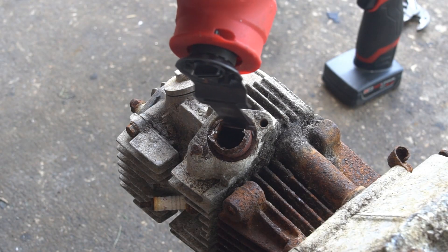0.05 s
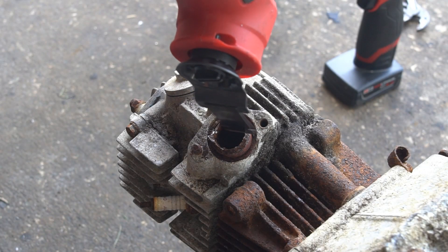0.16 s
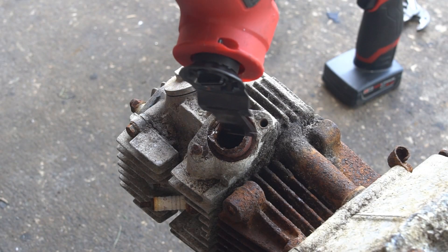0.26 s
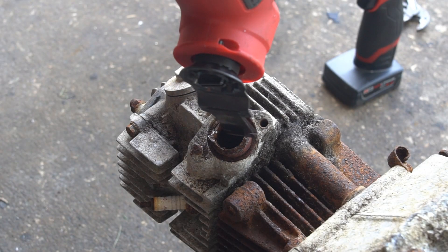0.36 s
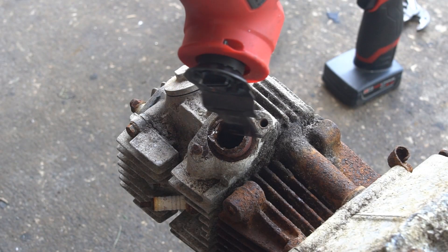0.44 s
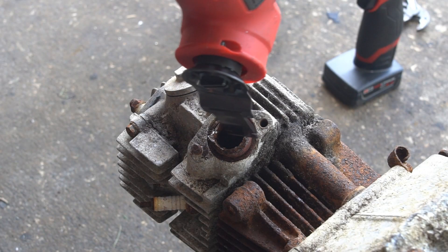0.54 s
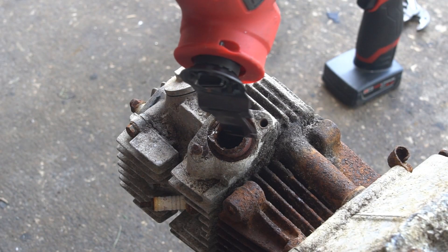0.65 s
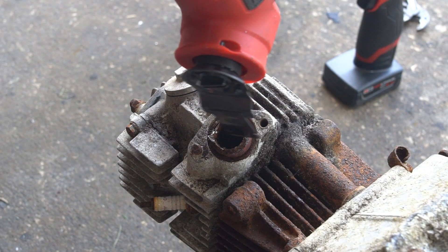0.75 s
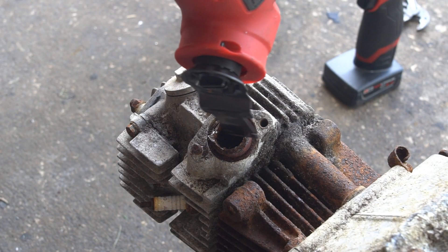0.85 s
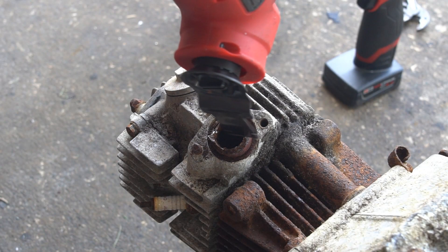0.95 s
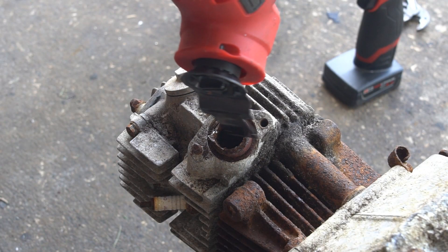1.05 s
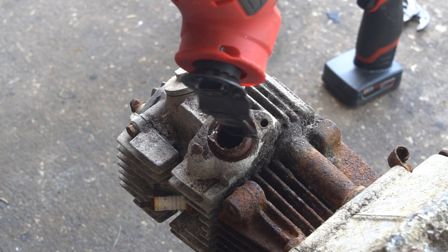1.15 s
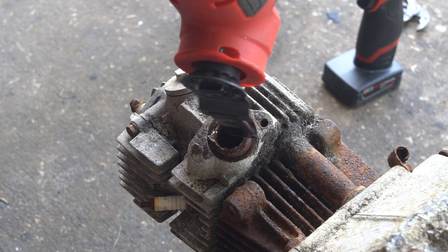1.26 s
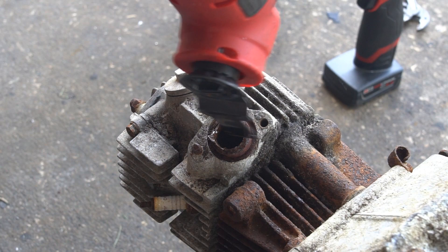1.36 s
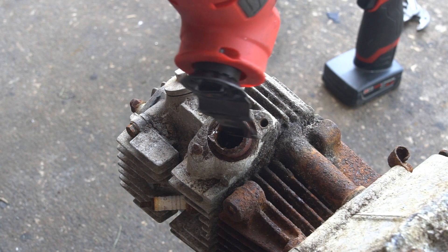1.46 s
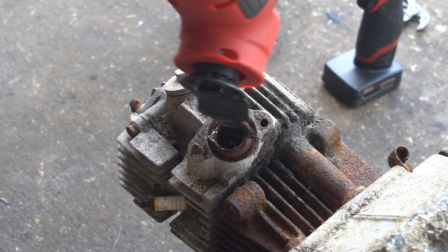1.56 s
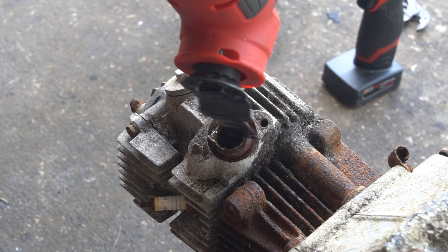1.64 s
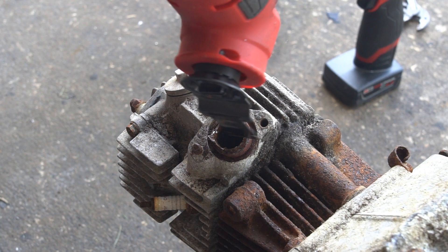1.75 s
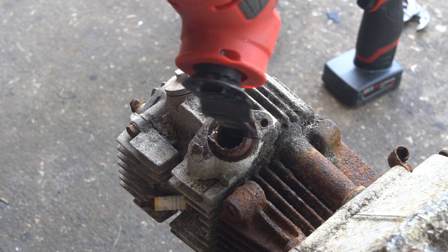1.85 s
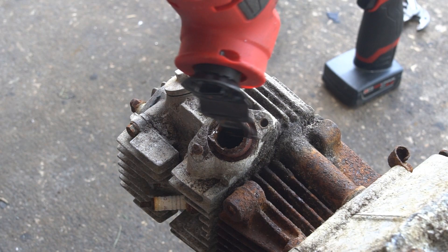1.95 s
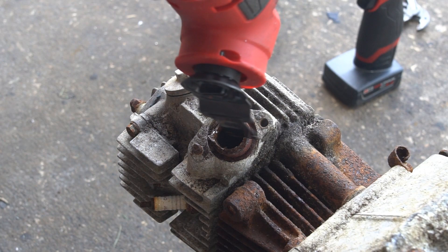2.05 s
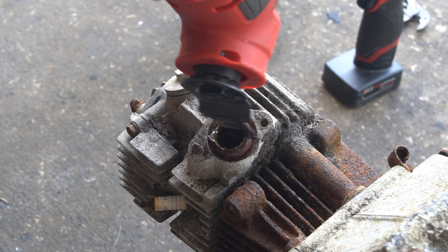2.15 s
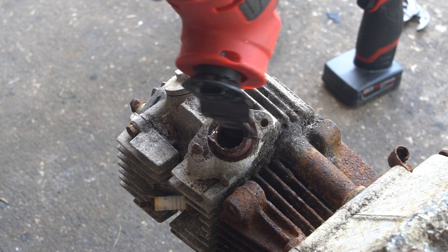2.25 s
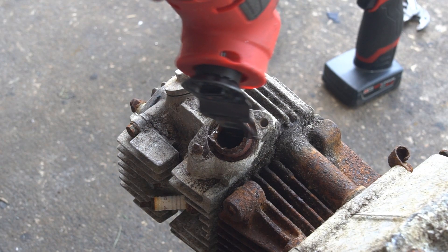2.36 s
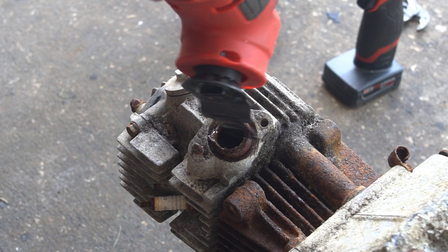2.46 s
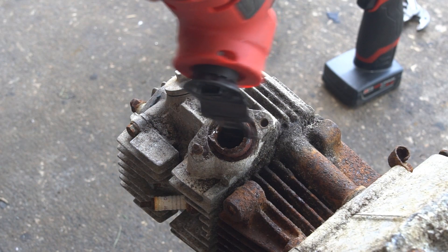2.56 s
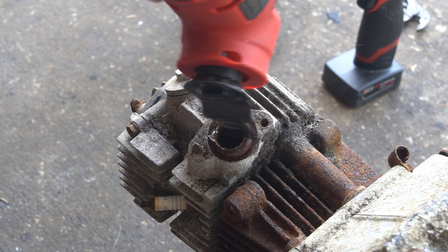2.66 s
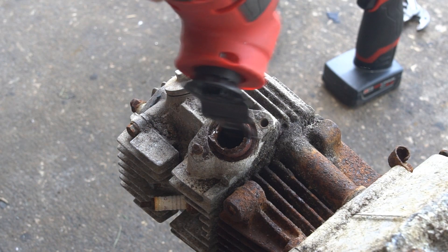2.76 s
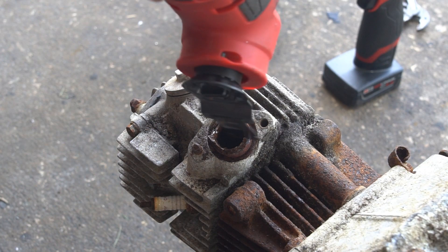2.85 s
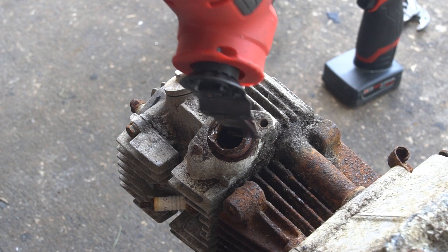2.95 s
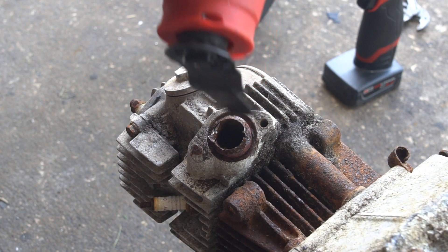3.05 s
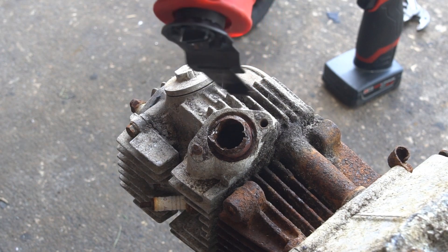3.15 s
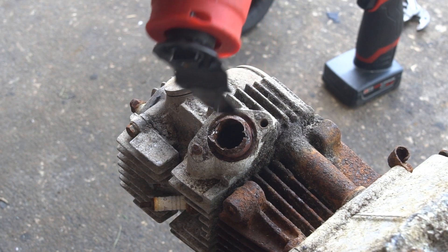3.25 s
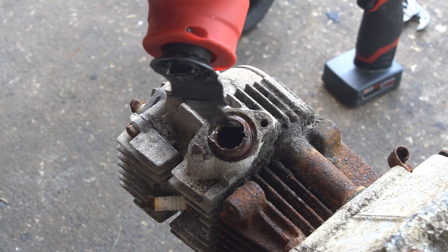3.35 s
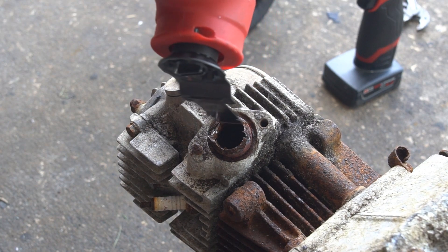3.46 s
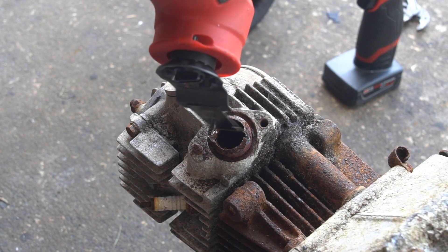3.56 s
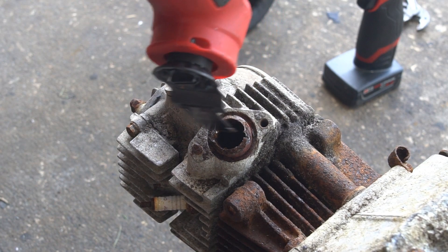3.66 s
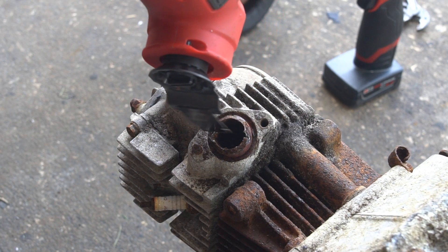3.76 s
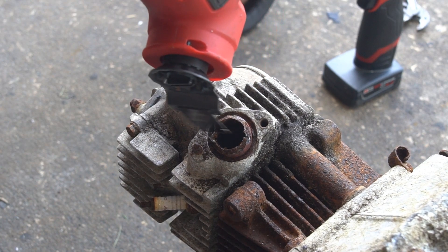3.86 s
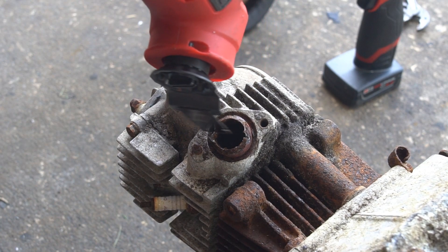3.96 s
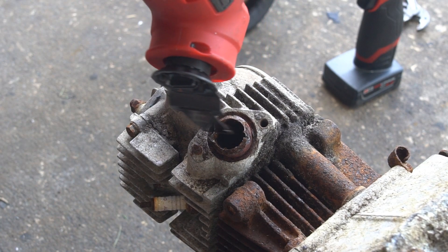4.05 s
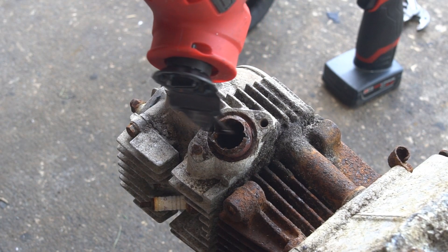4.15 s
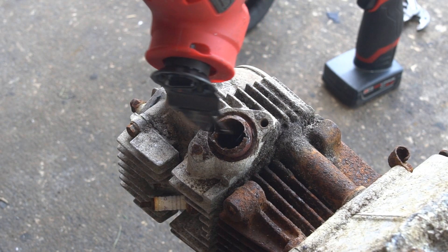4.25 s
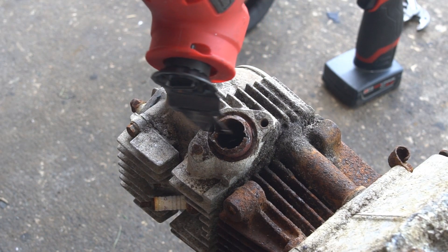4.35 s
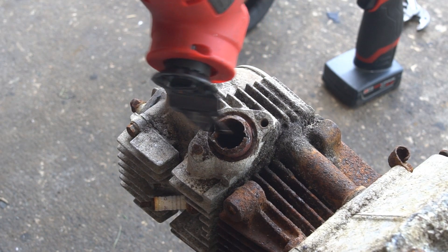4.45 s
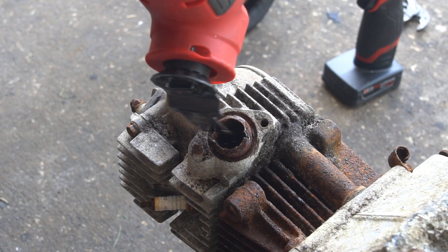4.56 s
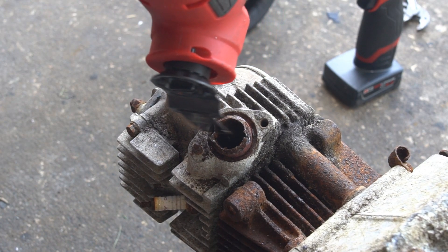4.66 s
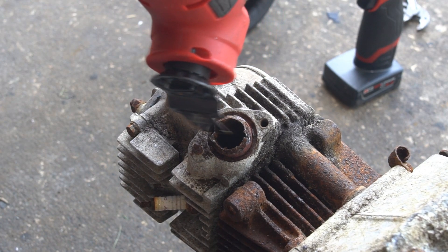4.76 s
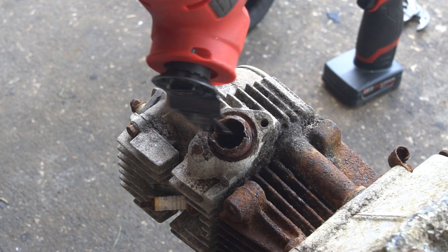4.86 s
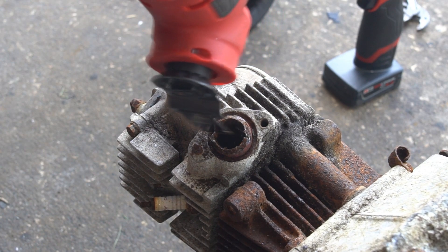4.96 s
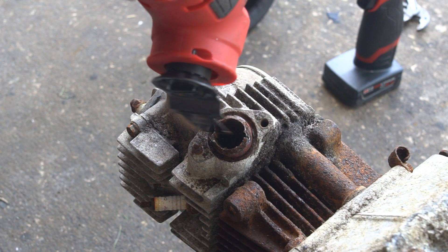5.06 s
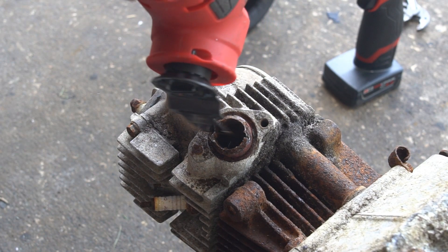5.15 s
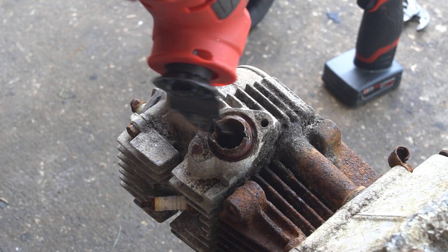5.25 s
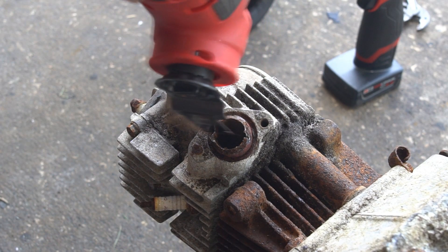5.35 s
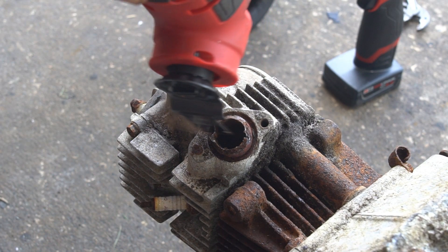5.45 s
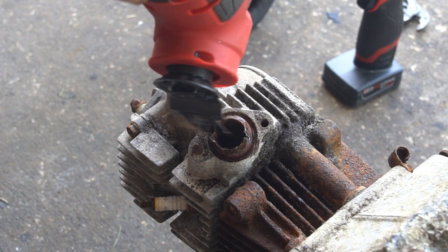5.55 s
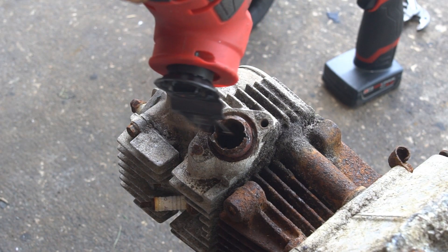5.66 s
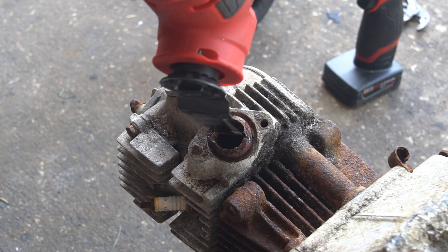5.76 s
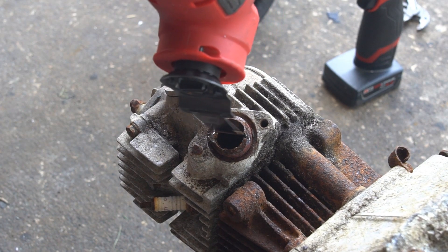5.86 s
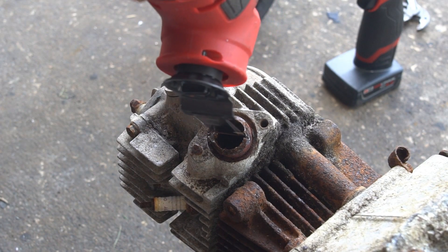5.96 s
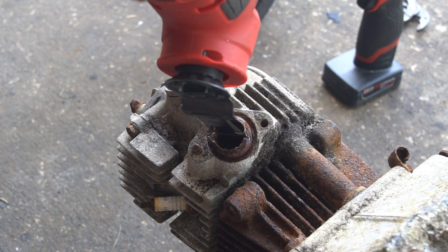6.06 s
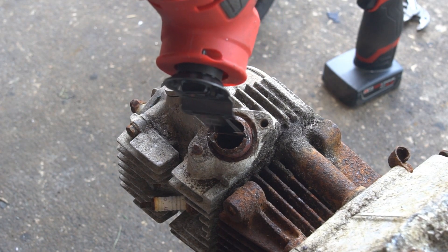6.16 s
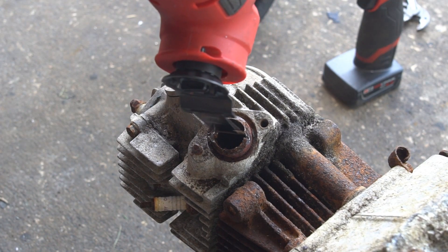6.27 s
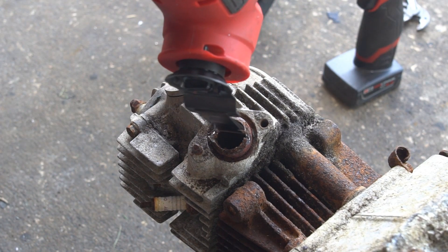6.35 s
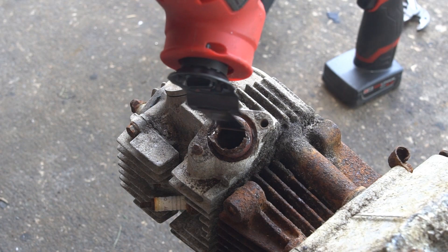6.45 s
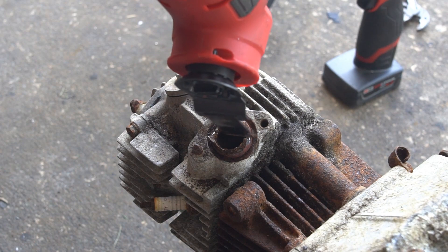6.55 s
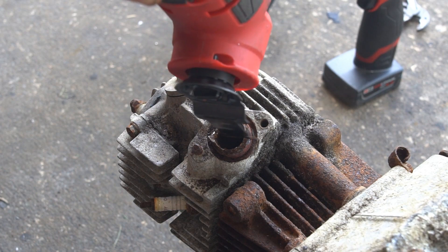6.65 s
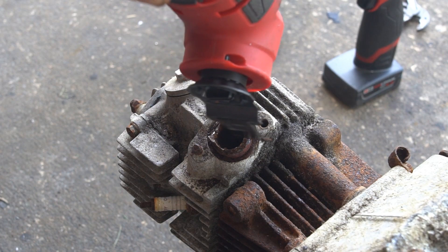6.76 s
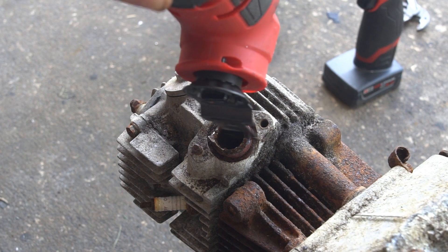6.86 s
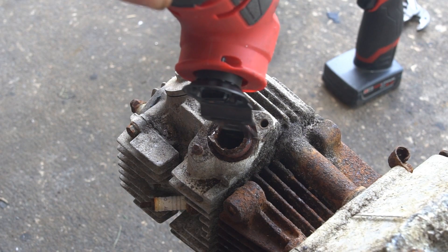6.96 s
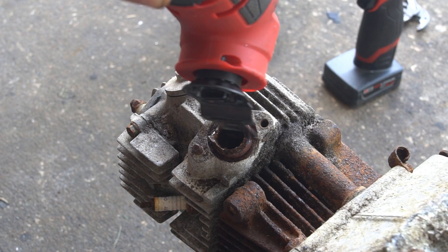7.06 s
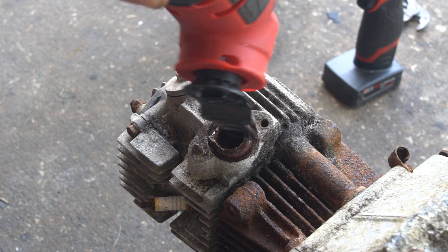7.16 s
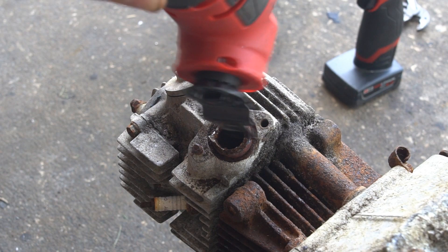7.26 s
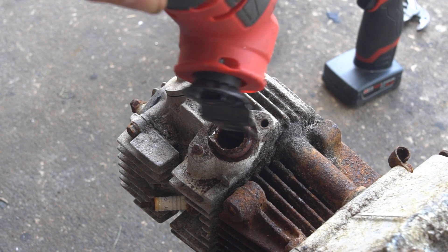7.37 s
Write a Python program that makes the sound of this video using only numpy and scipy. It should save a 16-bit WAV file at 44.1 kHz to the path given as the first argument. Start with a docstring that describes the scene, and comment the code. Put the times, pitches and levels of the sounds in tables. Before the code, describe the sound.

Close by, a power saw blade grinds harshly into rusted metal, lifts off with a steady motor buzz, then bites again.

```python
"""Oscillating saw on a rusty pipe stub

A cordless saw cuts a stub on a finned cylinder head, close by, in a humming workshop.
The motor holds one speed: drive lines plus gear noise. The teeth skip, bite and rasp on each
half stroke, the thin blade rings, and the head shudders and knocks under pressure.
Between cuts the tool runs free; once the blade mostly bounces on the rim."""
import sys
import numpy as np
from scipy import signal
from scipy.fft import rfft, irfft, next_fast_len
from scipy.io import wavfile
from scipy.ndimage import map_coordinates

SR = 44100
rng = np.random.default_rng(int(sys.argv[2]) if len(sys.argv) > 2 else 0)


def wav_out(sig):
    """Save sig, one row per channel (or a flat mono array), as 16-bit PCM at SR to the path in sys.argv[1]."""
    wavfile.write(sys.argv[1], SR, np.round(np.clip(np.atleast_2d(sig).T, -1, 1) * 32767).astype(np.int16))


N = 326781
MOTOR_HZ = 186.4

# blade on work: (start [s], length [s], rise [s], fall [s], level [dB], grip re level [dB], ring [dB])
CONTACTS = [(0.16, .12, .1, .02, -46, 8.5, -43), (0.284, .039, 0.011, 0.024, -33, 9.5, -26.5),
            (0.34, 0.14, .007, 0.047, -28.5, 6, -26.5), (0.51, 0.013, 0.0036, 0.059, -26.5, 3.5, -23.5),
            (0.529, 0.033, 0.016, 0.096, -23, 1.5, -25.5), (0.628, 0.069, 0.0037, 0.057, -25.5, 1.5, -25),
            (0.706, 2.16, 0.018, 0.15, -22, -1.5, -24.5), (3.675, 0.03, 0.011, 0.029, -33.5, 7.5, -43),
            (3.708, 0.024, .022, 0.058, -25, -1.5, -27), (3.764, .029, 0.021, 0.08, -18.5, -3.5, -26),
            (3.827, 0.057, .035, 0.051, -22, -3, -25), (3.899, 1.834, .016, 0.05, -21, -3.5, -26.5),
            (5.76, 0.07, .025, 0.037, -33.5, -2, -32.5), (5.955, 0.044, 0.0068, .04, -35.5, 4, -34.5),
            (5.973, .3, .03, 0.065, -25, -8.5, -27.5), (6.267, 0.063, 0.017, 0.12, -35, 3.5, -33),
            (6.548, .022, 0.0037, .04, -38, 8.5, -31.5), (6.621, .085, 0.0034, .03, -33, 0.5, -28.5),
            (6.712, 0.014, 0.0061, .04, -22, -2, -28), (6.73, 0.094, 0.017, .03, -26, -7.5, -28),
            (6.803, 0.037, 0.031, 0.045, -21.5, 0.5, -19.5), (6.844, 0.58, 0.022, .05, -23, -2.5, -23)]
# hand pressure: (time [s], level [dB])
PRESSURE_DB = [(0.3, -7.5), (0.8, 0), (1.4, -2), (2.2, 2), (2.55, 0), (2.68, -1), (2.88, 2), (3.7, -7.5),
               (4.3, -4.5), (4.6, 1), (5.0, 1.5), (5.15, 2.5), (5.58, 1.5), (5.78, -8), (6.88, -2),
               (7.1, 0.5), (7.41, 5)]
# blade bouncing: (time [s], share [0-1])
BOUNCE_SHARE = [(0, 0), (3.95, 0.09), (4.1, 0.35), (4.3, 0.24), (4.45, 0.23), (5.6, 0.12), (5.8, 0.1),
                (6.0, 0.44), (6.1, 0.83), (6.27, 0.8), (6.45, 0.5), (6.55, 0.01)]
# contact point on the edge: (time [s], position [0 middle, 1 corner])
CORNER_SHARE = [(0, 0.064), (3.0, 0.096), (3.6, 0.91), (4.3, 0.56), (5.5, 0.28), (6.0, 1), (6.4, 0.83),
                (6.6, .1), (7.41, 0.15)]
# snags that bend the blade: (time [s], level [dB], half width [s])
SNAG_SWELLS = [(0.468, -19.5, 0.013), (0.52, -26, .007), (0.58, -24, .008), (0.68, -25, 0.034),
               (0.802, -23.5, 0.0093), (3.702, -32, 0.0097), (6.3, -31.5, 0.037), (6.563, -31, 0.012)]
# head rocking on its support: (time [s], level [dB], knocks [count])
KNOCK_RUNS = [(2.375, -25, 1), (2.456, -26, 1), (2.536, -22, 3), (2.616, -22, 1), (2.804, -25, 2),
              (4.757, -29, 1), (4.794, -28, 1), (4.967, -23, 3), (5.357, -23, 2), (7.193, -28, 1),
              (7.337, -30, 1), (7.387, -26, 1)]

# blade, head and support resonances: (frequency [Hz], width [Hz], level [dB])
MIDDLE_MODES = [(3380, 110, -11), (6795, 80, -3), (6900, 70, -5), (7020, 80, -2), (7160, 80, 1),
                (7270, 80, -1), (7380, 80, -7), (7520, 80, -7), (8800, 500, -11), (10325, 60, -3),
                (10790, 60, -1), (10920, 60, -8), (11740, 70, -9), (12380, 160, -8), (14530, 60, 0)]
CORNER_MODES = [(3380, 80, -9), (7110, 100, 4), (7230, 120, -2), (7480, 120, -9), (9270, 160, -4),
                (9420, 130, 0), (10800, 60, 5), (11600, 60, -6), (11790, 60, -5), (12360, 200, -2),
                (13600, 220, -9), (14515, 80, 1), (14950, 300, -11), (15480, 150, -8)]
BENDING_MODES = [(2980, 90, -5), (3375, 70, 0), (3460, 70, -6), (3750, 70, -10), (7160, 60, 4)]
HEAD_MODES = [(1250, 50, -6), (1380, 70, -7), (1620, 90, -3), (1725, 70, 1), (1835, 70, 1), (2040, 50, -5),
              (2130, 50, 4), (2610, 60, -5), (2830, 70, -2), (2915, 90, 3), (3010, 80, 0), (3160, 80, -4),
              (3380, 90, -4), (3735, 90, 2), (4290, 130, -2), (4450, 130, -6), (4850, 110, -4),
              (5750, 170, -7)]
SUPPORT_MODES = [(278.5, 6.2, 0), (357, 28, -3), (457, 23, 8), (620, 155, 8.5), (724, 34, 5.5),
                 (885, 60, -28.5)]

# free-running drive: (harmonic [x stroke rate], level [dB])
DRIVE_LINES = [(1, -26), (2, -31), (3, -9.5), (4, -14), (5, -24), (6, -4), (7, -8.5), (8, -8), (9, -8),
               (10, -6), (11, -16), (12, -11), (13, -12), (14, -8), (15, -2), (16, -10), (17, -12),
               (18, -4), (19, -16), (20, -6.5), (21, -9), (22, -16), (23, 0), (24, -13), (25, -10),
               (26, -3), (27, -11), (28, -12), (29, -9), (30, -15), (31, -15), (32, -13), (33, -12),
               (34, -15), (35, -12), (36, -11), (37, -13), (38, -9), (39, -11)]
# whines swelling as the tool moves: (time [s], harmonic 18 gain [dB], harmonic 23 gain [dB])
WHINE_DB = [(0, 3, 3), (0.22, 8, 1), (3.22, 0, -8), (3.34, -6, 3), (3.58, 5, 1), (4.2, -13, -2),
            (5.75, -4, -10), (5.86, 9, -1), (6.1, 3, -3), (7.41, 3, 2)]
# workshop hum: (frequency [Hz], level [dB])
HUM_LINES = [(118.4, -79), (150.7, -71.5), (209.9, -76.5), (242.2, -69), (269.2, -71)]

# spectra of scrape, rust dust, gears, rattle and room: (frequency [Hz], level [dB])
RASP_SPECTRUM = [(200, -30.5), (600, -18.5), (950, -13), (1300, -3), (1800, 1.5), (2400, 1), (3000, 2.5),
                 (4000, 3), (5000, 4.5), (6400, -2), (8000, -15.5), (12000, -16), (16000, -33)]
DUST_SPECTRUM = [(4000, -34), (7000, -14), (8000, -4), (8800, 0), (9500, -2), (9950, -6), (10700, -3),
                 (11300, -5), (12380, -1), (12900, -6), (13500, -4.5), (14100, -6), (15000, -2.5),
                 (15700, -4)]
GEAR_SPECTRUM = [(300, -22), (500, -14), (850, -12), (1100, -3), (2200, -4), (2900, 0), (4000, -1),
                 (5000, 0), (6800, -1), (7700, -4), (8700, 2), (10000, -4), (12000, -6), (15500, -16)]
RATTLE_SPECTRUM = [(250, -30), (470, -6), (800, -26), (1020, 7), (1400, -14), (2000, -7), (2900, 7),
                   (4000, 9), (7000, -20)]
ROOM_SPECTRUM = [(25, -24), (60, -5), (100, -2), (150, -7), (240, 3), (330, 4), (600, 7), (2000, -6.5)]

# sideways reflections: (frequency [Hz], side gain [dB])
SIDE_SPECTRUM = [(60, -22), (170, -33), (350, -25), (700, -13), (1400, -10), (2800, -5.7), (5600, -6),
                 (10000, -4.5), (15000, -5.3)]
# stereo balance: (frequency [Hz], left re right [dB])
TILT_DB = [(330, 0), (800, -.4), (1800, -.6), (2740, 0), (4190, 1), (6410, 1.3), (9810, .5)]
# stereo phase: (frequency [Hz], left lead [rad])
LEAD_RAD = [(0, 0), (2070, 0.1), (2930, 0.84), (3270, -0.088), (4050, 1), (4310, 0.82), (7580, 1),
            (8530, -0.88), (9560, -1.1), (10300, 0.008), (10900, -1.24), (11900, -0.54), (13500, -0.72),
            (16500, 0.0)]


def cutting(stroke, touch, grip, ring, sway_db=.5, squeal_db=-17.5):
    """Teeth scrape each half stroke or bounce every second stroke; snags ring the blade."""
    bounce, corner = (np.clip(curves(rows)[0], 0, 1) for rows in (BOUNCE_SHARE, CORNER_SHARE))
    pressure_db, = curves(PRESSURE_DB)
    rasp = grip * amp(.48 * pressure_db + sway_db * wobble(11))
    fizz = touch * amp(sway_db * wobble(11))
    # pressure damps the bending modes
    squeal = ring * amp(squeal_db - corner - 1.5 * pressure_db) + swells(SNAG_SWELLS)
    hops = bursts(stroke / 2, scatter_db=1, jitter_turns=.035, decay_s=.008)
    scrape = bursts(2 * stroke, scatter_db=3, jitter_turns=.28, decay_s=.0058)
    snags = bursts(2 * stroke, scatter_db=4, jitter_turns=.32, decay_s=.0025)
    feed = amp(.33 * wobble(45))  # uneven hand pressure
    force = feed * np.sqrt((1 - bounce) * scrape ** 2 + bounce * hops ** 2)
    blows = np.sqrt((1 - bounce) * snags ** 2 + bounce * unit(hops ** 2) ** 2)
    teeth = amp(-2.5) * unit(coloured(force * grit(spread_db=4), RASP_SPECTRUM))
    head = amp(-2.5) * rung(force * grit(spread_db=3), HEAD_MODES)
    dust = unit(coloured(force * grit(spread_db=3), DUST_SPECTRUM))
    middle = amp(2) * np.sqrt(1 - corner) * rung(blows * noise(), MIDDLE_MODES)
    edge = amp(4.5) * np.sqrt(corner) * rung(blows * noise(), CORNER_MODES)
    # a bouncing corner sheds less dust and rings the top modes instead
    chime = amp(-1) * rung(blows * noise(), [mode for mode in CORNER_MODES if mode[0] > 8000])
    chime_share = .62 * bounce + .22 * corner
    treble = np.sqrt(1 - chime_share) * dust + np.sqrt(chime_share) * chime
    bending = rung(force * noise(), BENDING_MODES)
    return rasp * (teeth + head) + ring * (middle + edge) + fizz * treble + squeal * bending


def contact(fall_db=19, ring_db_per_db=.64):
    """Touch, grip and ring gains: each contact rises, holds, fades and lifts; the ring fades slower."""
    t = np.arange(N) / SR
    gains = np.zeros((3, N))
    for start_s, length_s, rise_s, fall_s, db, grip_db, ring_db in CONTACTS:
        on = slice(int(start_s * SR), int((start_s + length_s + fall_s) * SR))
        leaving = np.clip((t[on] - start_s - length_s) / fall_s, 0, 1)
        gate = np.clip((t[on] - start_s) / rise_s, 0, 1) * (1 - leaving ** 10)
        fade_db = -fall_db * leaving
        levels_db = [db + fade_db, db + grip_db + fade_db, ring_db + ring_db_per_db * fade_db]
        gains[:, on] = np.maximum(gains[:, on], gate * amp(levels_db))
    return gains


def bites(clink_db=2.5, ref_rise_s=.005):
    """A tooth catches the rim on landing: a clink over a short scrape, softer on slow landings."""
    clink = rung(noise(), MIDDLE_MODES + BENDING_MODES)
    scrape = amp(-8) * unit(coloured(noise(), RASP_SPECTRUM))
    landings = [(start_s + rise_s / 2, db + clink_db - 20 * np.log10(rise_s / ref_rise_s))
                for start_s, _, rise_s, _, db, *_ in CONTACTS]
    return struck(landings, decay_s=.0091) * (clink + scrape)


def motor(stroke, load, level_db=-35, damping_db=-8, flutter_db=2):
    """Lines of the eccentric drive, plus gear noise swelling at both ends of each stroke."""
    whines_db = {k: db + flutter_db * wobble(30) for k, db in zip((18, 23), curves(WHINE_DB))}
    lines = 0
    for k, db in DRIVE_LINES:
        drift_db = min(.4 + .1 * k, 2.2) * wobble(4)  # short waves shift most as the tool moves
        held_db = damping_db * load * (k < 17)  # the work holds the blade, damping low lines
        lines += amp(db + whines_db.get(k, 0) + drift_db + held_db) * partial(k * stroke)
    lines /= np.sqrt(sum(amp(db) ** 2 for _, db in DRIVE_LINES) / 2)
    slap = 1 + .42 * np.cos(4 * np.pi * stroke)
    gears = unit(coloured(noise() * slap, GEAR_SPECTRUM))
    return amp(level_db - .5 * load) * (amp(-1.66) * lines + amp(-3.5) * gears)


def casting(stroke, grip, grind_db=-22, strokes_per_knock=4):
    """The heavy head shudders under the blade; rocking, it knocks and rings its fins."""
    hits = [(time_s + k * strokes_per_knock / MOTOR_HZ, db)
            for time_s, db, count in KNOCK_RUNS for k in range(count)]
    knocks = struck(hits, decay_s=.0039)
    shudder = bursts(2 * stroke, scatter_db=6.5, jitter_turns=.45, decay_s=.0032) * grit(spread_db=2)
    force = grip * amp(grind_db + curves(PRESSURE_DB)[0]) * shudder + amp(-4) * knocks * noise()
    thud = coloured(rung(force, SUPPORT_MODES), [(60, -26), (150, -31), (250, 1), (900, 1), (2500, 18)])
    fins = amp(-2) * knocks * rung(noise(), HEAD_MODES[:11])
    return np.std(force) * thud + fins


def rattle(stroke, level_db=-39):
    """Bouncing every second stroke adds tones halfway between the drive lines."""
    halfway = sum(amp(rng.normal(0, 3)) * partial((k + .5) * stroke) for k in range(2, 22))
    return amp(level_db) * curves(BOUNCE_SHARE)[0] * unit(coloured(halfway, RATTLE_SPECTRUM))


def workshop(floor_db=-62):
    """Low, slightly wavering hum over room noise."""
    t = np.arange(N) / SR
    hum = sum(amp(db + 1.6 * wobble(2.9)) * np.sin(2 * np.pi * hz * t + .5 * wobble(4.2))
              for hz, db in HUM_LINES)
    return hum + amp(floor_db) * unit(coloured(rng.standard_normal(N), ROOM_SPECTRUM))


def echoes(x, t60_s, delay_s):
    """Diffuse reflections from a unit-energy tail."""
    t = np.arange(SR // 2) / SR
    tail = rng.standard_normal(len(t)) * amp(-60 * t / t60_s) * (t > delay_s)
    return signal.fftconvolve(x, tail / np.linalg.norm(tail))[:N]


def bursts(phase, scatter_db, jitter_turns, decay_s):
    """Envelope of one blow per turn of phase, uneven in time and size; rms 1."""
    turns = np.arange(int(phase[-1]))
    timing, size = rng.standard_normal((len(turns), 2)).T
    onsets = np.interp(turns + jitter_turns * timing, phase, np.arange(N)).astype(int)
    blows = np.bincount(onsets, amp(scatter_db * np.minimum(size, 2)), N)
    return unit(decaying(blows, decay_s))


def struck(events, decay_s):
    """Envelope of blows: (time [s], level [dB])."""
    time_s, db = np.transpose(events)
    return decaying(np.bincount((time_s * SR).astype(int), amp(db), N), decay_s)


def decaying(impulses, decay_s):
    """Exponential tail on each impulse."""
    return signal.lfilter([1], [1, -np.exp(-1 / (decay_s * SR))], impulses)


def swells(events):
    """Envelope of Gaussian swells."""
    t = np.arange(N) / SR
    return sum(amp(db) * np.exp(-.5 * ((t - time_s) / width_s) ** 2) for time_s, db, width_s in events)


def grit(spread_db):
    """Tiny fractures of rust and steel, very unequal in size."""
    return unit(noise() * amp(spread_db * np.minimum(rng.standard_normal(N), 2)))


def noise():
    """Independent white noise in mid and side."""
    return rng.standard_normal((2, N))


def partial(phase):
    """Sine of phase [turns], randomly offset in mid and side."""
    return np.sin(2 * np.pi * (phase % 1 + rng.random((2, 1))))


def wobble(rate_hz):
    """Smooth random curve, rate_hz knots a second."""
    count = int(N * rate_hz / SR) + 4
    smooth = map_coordinates(rng.standard_normal(count), [np.arange(8 * count - 8) / 8])
    return np.interp(np.arange(N) * 8 * rate_hz / SR, np.arange(len(smooth)), smooth)


def rung(x, modes):
    """x through a resonator bank; rms 1."""
    return unit(filtered(x, lambda f: sum(amp(db) * 1j * f * width / (hz * hz - f * f + 1j * f * width)
                                          for hz, width, db in modes)))


def coloured(x, spectrum):
    """x through a spectrum: (frequency [Hz], level [dB])."""
    return filtered(x, lambda hz: amp(along(spectrum, hz)))


def filtered(x, response):
    """x through a complex frequency response."""
    size = next_fast_len(N + SR // 4)
    hz = np.fft.rfftfreq(size, 1 / SR).astype(np.float32)
    return irfft(rfft(x.astype(np.float32), size) * response(hz), size)[..., :N]


def along(points, hz):
    """Points joined on a log frequency axis."""
    knots_hz, values = np.transpose(points)
    return np.interp(np.log(hz + 1), np.log(knots_hz + 1), values)


def curves(rows):
    """Per-sample curve for each column after time."""
    time_s, *columns = np.transpose(rows)
    return [np.interp(np.arange(N) / SR, time_s, column) for column in columns]


def amp(db):
    """Decibels to gain."""
    return np.exp(np.asarray(db) * (np.log(10) / 20))


def unit(x):
    """Scale to rms 1."""
    return x / np.sqrt(np.mean(x ** 2) + 1e-20)


def scene(highpass_hz=170):
    """Tool and work in front; fins, floor and walls spread the treble sideways."""
    touch, grip, ring = contact()
    load = np.clip((grip + touch) / amp(-18), 0, 1)
    tremble = .0004 * wobble(12) + (.0012 + .00243 * load) * wobble(90)
    stroke = np.cumsum(MOTOR_HZ * (1 + tremble)) / SR  # phase [turns]
    work = motor(stroke, load) + cutting(stroke, touch, grip, ring)
    work += bites() + rattle(stroke) + casting(stroke, grip)
    # small parts radiate no deep bass
    work = signal.sosfilt(signal.butter(4, highpass_hz, "high", fs=SR, output="sos"), work)
    mid, side = work + workshop()
    mid = mid + amp(-18) * echoes(mid, t60_s=.25, delay_s=.006)
    side = amp(-2) * coloured(side, SIDE_SPECTRUM)
    half = np.array([[.5], [-.5]])  # left, right
    return filtered(np.array([mid + side, mid - side]),
                    lambda hz: amp(half * along(TILT_DB, hz)) * np.exp(1j * half * along(LEAD_RAD, hz)))


def record(dry, top_hz=15800):
    """Soft peak limit, then band limit."""
    rounded = dry / (1 + np.abs(dry) ** 8) ** (1 / 8)
    return filtered(rounded, lambda hz: hz < top_hz)


dry = scene()
out = record(dry)
wav_out(out)
```